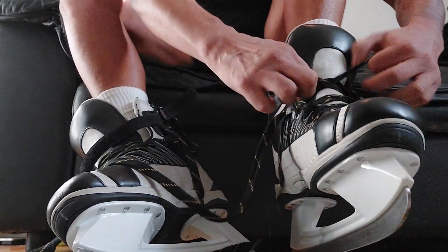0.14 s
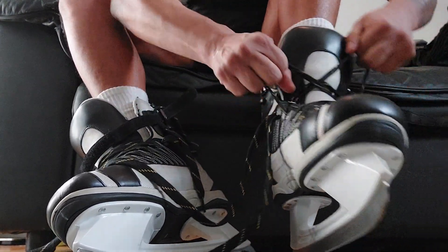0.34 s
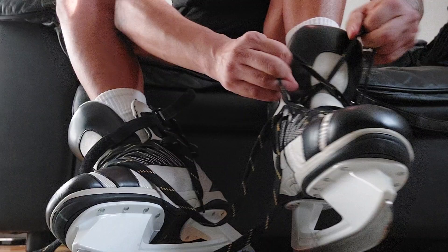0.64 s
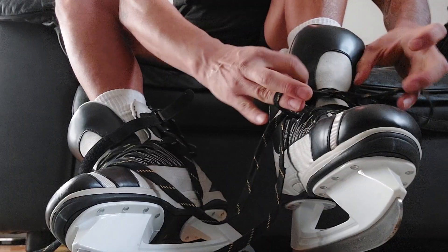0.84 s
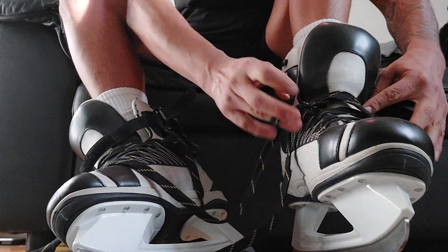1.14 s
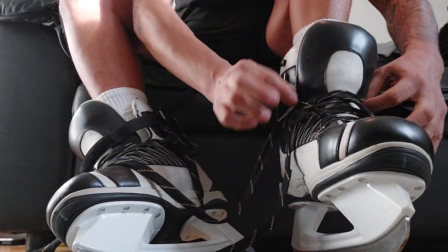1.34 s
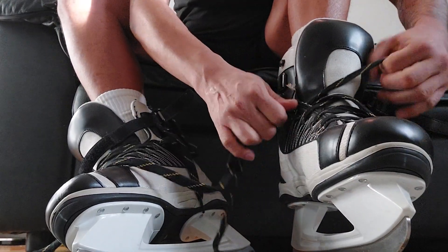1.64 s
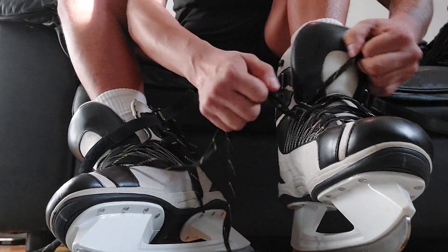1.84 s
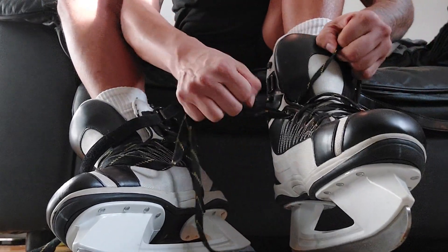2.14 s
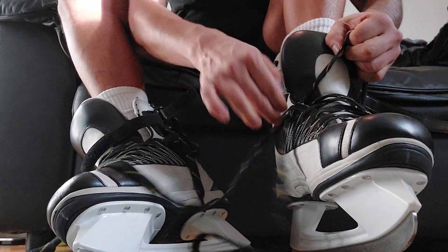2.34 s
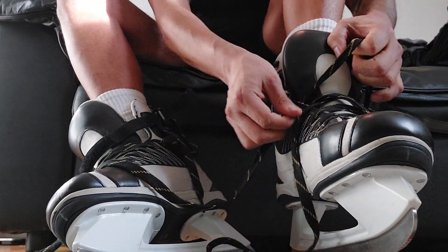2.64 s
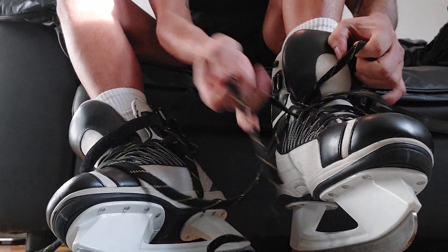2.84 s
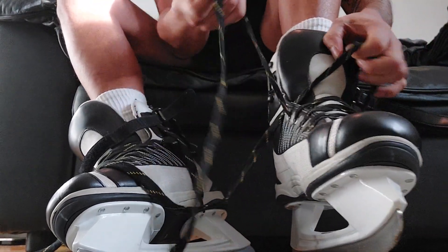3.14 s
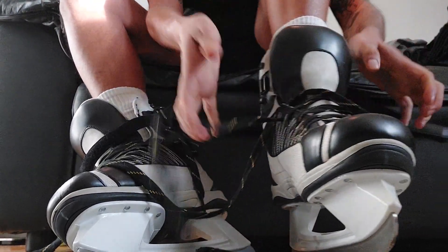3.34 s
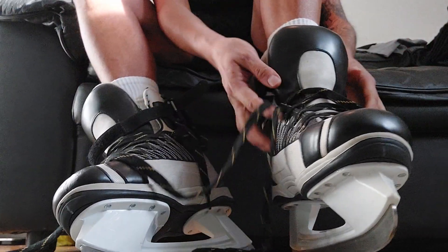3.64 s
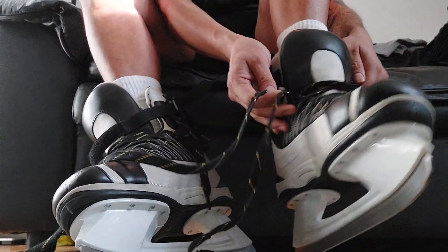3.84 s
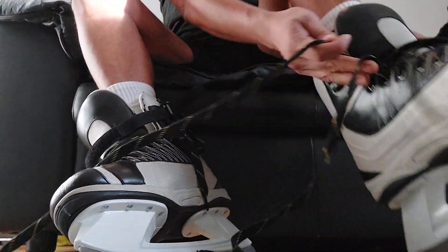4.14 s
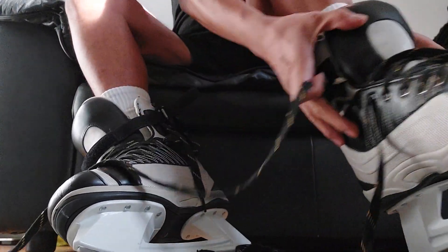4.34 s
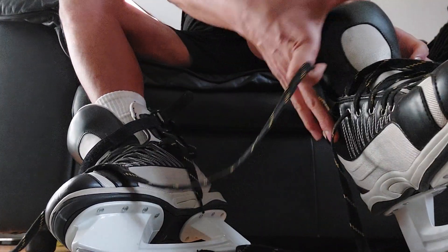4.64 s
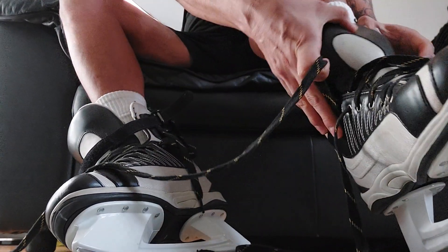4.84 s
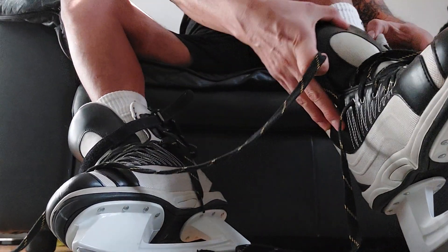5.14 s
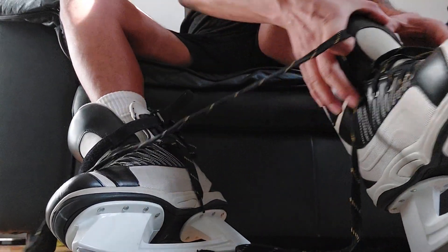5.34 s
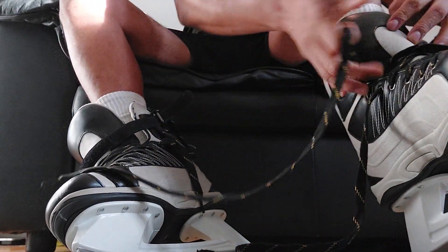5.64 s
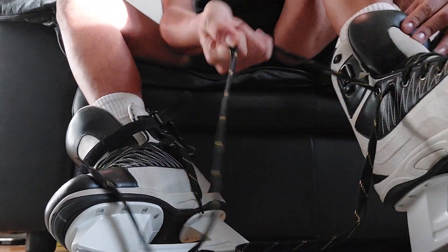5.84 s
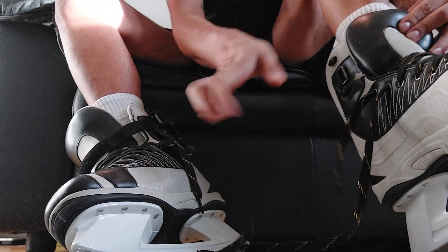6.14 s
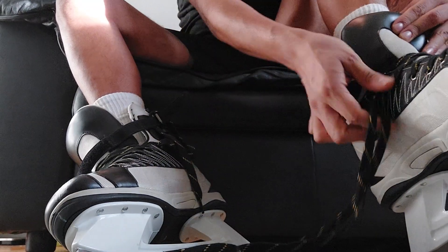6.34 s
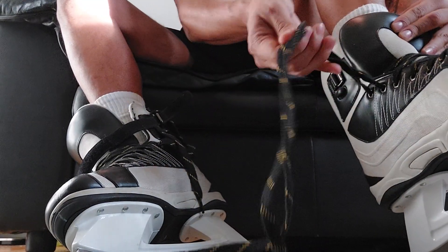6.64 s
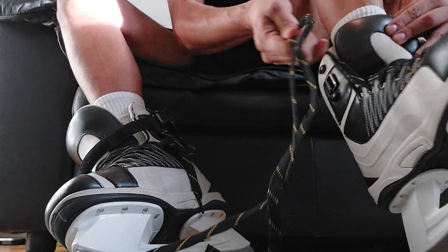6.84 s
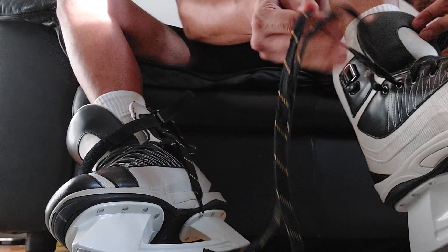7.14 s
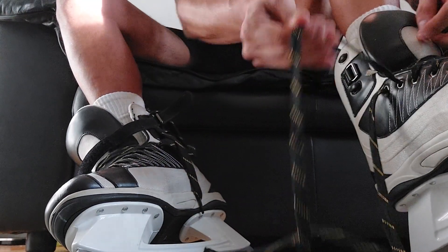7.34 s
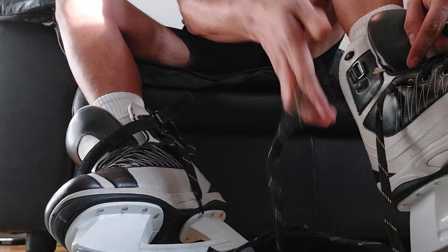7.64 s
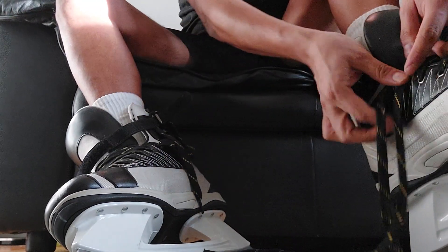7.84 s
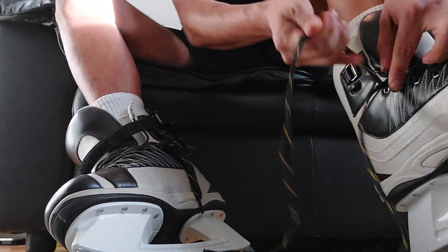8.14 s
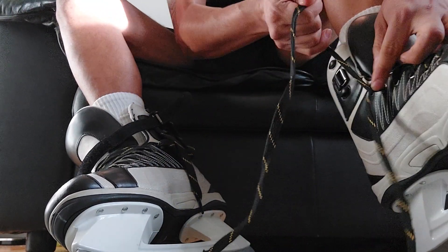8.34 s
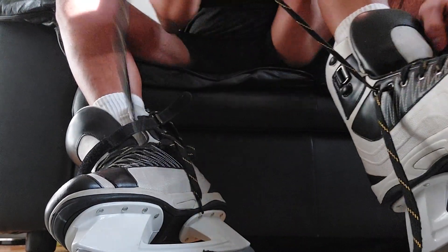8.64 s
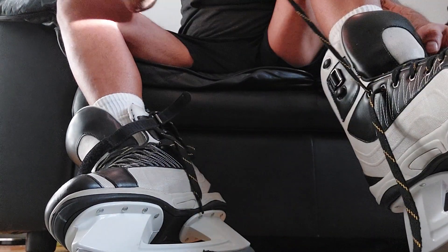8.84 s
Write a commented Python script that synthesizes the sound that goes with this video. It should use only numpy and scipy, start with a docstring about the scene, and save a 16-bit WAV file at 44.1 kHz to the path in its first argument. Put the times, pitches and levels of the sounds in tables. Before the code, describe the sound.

Laces are pulled through the eyelets of a stiff ice skate in short, uneven tugs, rasping into the hollow boot and hissing through the fingers. Fingers and lace tips tick on the shell. A lace zips with a rising tone, then the skate thumps on the floor about halfway through. A shorter zip and a sharp snap follow before the last pulls, all close to a stereo microphone in a quiet room.

```python
"""Laces are hauled through the eyelets of a stiff new skate in a quiet room, near a stereo microphone.
From the start the braid rasps into the hollow boot and hisses through the fingers, while fingers and
lace tips tick on the shell. Near 3 s the lace zips over an eyelet with a rising tone. Just after 4 s
the skate thumps on the floor and its steel blade rings faintly. A shorter zip comes near 6 s and a
sharp snap near 8 s, before the last few pulls."""
import sys
import numpy as np
from scipy import signal
from scipy.fft import rfft, irfft, next_fast_len
from scipy.io import wavfile

SR = 44100
rng = np.random.default_rng(int(sys.argv[2]) if len(sys.argv) > 2 else 0)


def master(y):
    """Save y as 16-bit WAV."""
    cut = np.clip(np.atleast_2d(y).T, -1, 1)
    pcm = np.round(cut * 32767)  # scale
    wavfile.write(sys.argv[1], SR, pcm.astype(np.int16))


N = 396018

# Levels in the tables are relative. A ring time is how long a note takes to fade by 60 dB.
# pulls of the lace: (start [s], length [s], swell [dB], final rasp [dB], final rumble [dB], final hiss [dB])
PULLS = [(-0.03, 0.26, 9.5, -45.5, -47.5, -62), (0.215, 0.27, 14, -37, -39, -58.5),
         (0.59, 0.11, 7.5, -58, -46, -100), (0.678, 0.085, 7.5, -44.5, -45, -65),
         (0.783, 0.088, 0, -56, -53.5, -81), (0.917, 0.094, 6, -47, -46.5, -72.5),
         (1.03, .13, 0.5, -45.5, -46, -66), (1.248, 0.26, -2, -49.5, -53.5, -69.5),
         (1.548, 0.19, -5, -54.5, -48.5, -68.5), (1.749, 0.11, 21, -44.5, -46, -64),
         (1.877, 0.2, 3, -48.5, -49.5, -69.5), (2.241, 0.047, 1, -64, -61, -93),
         (2.42, 0.067, 5.5, -65, -65, -81), (2.557, 0.05, 4, -47.5, -43.5, -74),
         (2.779, 0.22, 23.5, -46, -44.5, -62.5), (3.256, 0.16, -1.5, -63, -63, -85),
         (3.59, 0.41, 16, -52, -57.5, -73), (3.936, 0.043, 2.5, -50, -39.5, -58.5),
         (4.03, 0.18, 5.5, -65, -59, -77), (4.231, 0.28, -21, -69, -68, -81.5),
         (4.523, 0.082, 1, -55.5, -61, -70), (4.637, 0.074, 0, -53, -44.5, -70.5),
         (4.744, 0.21, 23.5, -38.5, -42.5, -61), (4.964, 0.11, 1, -50, -55, -67.5),
         (5.227, 0.17, 8.5, -53.5, -54.5, -73.5), (5.44, 0.11, 7.5, -53.5, -53, -73),
         (5.565, 0.15, 0.5, -58.5, -56, -73), (5.763, 0.12, 12, -42.5, -42.5, -57.5),
         (5.945, 0.025, -10, -52.5, -49, -74), (6.022, 0.016, 6, -58, -56, -76),
         (6.34, 0.11, 5, -61.5, -94, -72.5), (6.518, 0.13, 5.5, -60, -62.5, -73.5),
         (6.793, 0.13, 22.5, -46.5, -43, -69), (7.27, 0.097, 5.5, -58.5, -52, -82),
         (7.503, 0.087, 17, -54, -42, -66), (7.806, 0.14, 11, -50, -48, -74),
         (8.046, 0.31, 27.5, -45, -41, -67), (8.436, 0.11, 4, -60.5, -53, -72),
         (8.592, 0.17, 31, -91, -63, -64), (8.772, 0.2, 5.5, -59.5, -59, -64.5)]
# tone of the rasp in the shell, rumble in the sole and hiss of the fibres: (frequency [Hz], level [dB])
RASP_TONE = [(200, -38), (300, -3.5), (460, -2.5), (620, -5), (900, -11), (1400, -17), (2000, -24.5),
             (2800, -38.5), (3600, -55)]
RUMBLE_TONE = [(50, 0), (90, -17), (134, 4.5), (172, -10), (225, 2), (350, -7.5)]
HISS_TONE = [(2000, -2), (3300, -6.5), (5300, -2.5), (8900, -11), (11800, 1.5), (15900, -1.5)]
# top octave of the hiss against its lower part: (time [s], level [dB])
HISS_SHEEN = [(0, 1), (.8, 1.5), (1.0, -3), (2.2, 1.5), (3.0, -1), (3.65, 4.5), (3.85, 0.5), (4.0, -4.5),
              (4.62, 3.5), (4.85, -5.5), (5.3, -3), (6.0, 0), (6.5, 5), (7.0, -3.5), (7.6, -3.5),
              (7.9, 9.5), (8.3, 0), (8.7, -8)]
# braid over an eyelet: (start [s], length [s], first pitch [Hz], middle [Hz], last [Hz], level [dB])
ZIPS = [(2.796, 0.2, 302.3, 503, 1005, -49), (5.784, .115, 493, 644.5, 402, -38)]
# taps on the shell: (time [s], level [dB], sole level [dB], panels against the tap's level [dB])
TAPS = [(0.0175, -18.5, -25.5, -32), (0.073, -32, -56, 7.5), (0.202, -30.5, -9.5, -2), (0.82, -36, -48, -3),
        (0.873, -36, -67, -4), (0.943, -31, -24.5, -39), (1.002, -38, -56, -1), (1.148, -24, -17.5, -4),
        (1.222, -33, -59, 1.5), (1.248, -35, -51, 4), (1.27, -26, -58, -1.5), (1.303, -36, -58, 4.5),
        (1.312, -20.5, -61, -9), (1.32, -24, -52, -0.5), (1.34, -28.5, -53, -1), (1.373, -26.5, -56, -5.5),
        (1.413, -22.5, -56, -6), (1.43, -22.5, -25.5, -5), (1.491, -28.5, -57, -2.5),
        (1.521, -30.5, -55, -26), (1.561, -28, -28, 3.5), (1.605, -21.5, -26, -1), (1.667, -27, -29, -10),
        (1.777, -33, -60, -9), (2.019, -30.5, -59, -1), (2.038, -27.5, -57, -5), (2.074, -26, -51, -5),
        (2.105, -29, -31, -8), (2.131, -35.5, -33.5, 1), (2.167, -39.5, -51, -9), (2.193, -37.5, -37, -12),
        (2.563, -35, -29, 3), (2.593, -38, -30, 2), (3.427, -49, -42, -18), (3.733, -38.5, -38, -17),
        (3.77, -47, -55, 4.5), (3.853, -47, -47, -2), (3.895, -42, -54, 2), (3.949, -24, -16, 5),
        (3.969, -31, -34, -10), (4.19, -45, -40, -7), (4.282, -48, -37, 7), (4.331, -41.5, -33, 8.5),
        (4.396, -43, -41, 0), (4.534, -44.5, -61, 6), (4.587, -36, -32.5, -10), (4.672, -26.5, -50, -40),
        (4.708, -32, -63, -19), (4.904, -28, -43, 1), (4.92, -26, -28, -6), (4.957, -26, -36, -16),
        (5.058, -36.5, -53, 7.5), (5.076, -30, -57, -2), (5.546, -37, -42, -2), (5.655, -36.5, -36, -4.5),
        (5.713, -34.5, -66.5, -29), (5.96, -31.5, -44, -14), (6.252, -44, -63, -7), (6.385, -51, -73, 11),
        (6.428, -45, -75, 12), (6.436, -43, -75, 15), (7.217, -35.5, -45, -43), (7.286, -40, -62, -26),
        (7.304, -36, -58, -9), (7.354, -36, -37, -7), (7.609, -29.5, -49, -15), (7.818, -55, -31, 12),
        (7.845, -53, -27.5, 8), (7.934, -38, -57, 15.5), (7.942, -29.5, -61, 4), (8.461, -36.5, -35, -13),
        (8.72, -46, -60, -27)]
# notes of the boot's hollow, side panels and sole: (frequency [Hz], level [dB], ring time [s])
HOLLOW_NOTES = [(351, -5, 0.05), (464, 11.5, 0.022), (604, 0.5, 0.025)]
PANEL_NOTES = [(780, -0.5, .015), (1044, 7.5, .0043), (1516, -5, .012), (1860, -2, .0059)]
SOLE_NOTES = [(136.2, -1, 0.19), (211.8, 3, 0.11), (253.3, 2, 0.077)]
# lace tips hitting plastic: (time [s], level [dB])
TIP_SNAPS = [(0.7058, -71), (2.073, -62), (4.093, -57), (4.2636, -59), (4.284, -53), (4.5495, -62),
             (5.379, -68), (5.544, -53.5), (6.336, -63.5), (6.4286, -53.5), (6.438, -52), (7.935, -56),
             (7.9437, -46.5)]
# hard scrapes of the shell: (time of peak [s], rise [s], fall [s], level [dB])
SCRAPES = [(1.592, 0.0098, 0.014, -45), (3.956, 0.018, 0.048, -50), (7.095, .015, 0.034, -67),
           (7.94, 0.02, 0.024, -61)]
# tone of a scrape: (frequency [Hz], level [dB])
SCRAPE_TONE = [(550, -5), (1150, 11.5), (1750, 3.5), (2300, -2), (3300, -5), (6000, -32)]
# skate meeting the floor: (time [s], floorboard level [dB], blade level [dB])
FLOOR_HITS = [(.2, -52, -55), (1.146, -44, -61), (4.245, -14.5, -59)]
# notes of the floorboards and the blade: (frequency [Hz], level [dB], ring time [s])
BOARD_NOTES = [(83, 1, 0.051), (126, 2.5, 0.072), (202, -4.5, .082), (120.5, -10, 0.28)]
BLADE_NOTES = [(5420, -2, .24), (5480, -3, .2), (5660, -4, .1), (11730, 0, .2)]
# room and microphone noise: (frequency [Hz], level [dB])
QUIET_TONE = [(25, -14), (120, 0), (438, -5.5), (1440, -18), (1990, -30), (6520, -37.5), (8780, -29.5),
              (13900, -56), (15900, -35)]
# mains hum: (frequency [Hz], level [dB])
MAINS_HUM = [(60, -80), (120, -85.5), (180, -86)]
# how alike left and right are: (frequency [Hz], likeness [0 to 1])
STEREO_LIKENESS = [(60, 0.57), (180, 0.86), (550, 0.9), (1650, 0.17), (4970, 0.21), (15000, 0)]
# the microphone's left side against its right: (frequency [Hz], level [dB])
LEFT_LEAN = [(100, 4), (1300, -2), (2400, 7.5), (3500, 10.5), (5800, 13), (7500, 4.5), (9500, -6.5),
             (12000, 1)]

GRIP_S = 0.021   # a pull sets in this fast
PITCH_WANDER = .05   # fingers damp and bend the boot, so no two taps ring at quite the same pitches
ROOM_RING_S, WALL_CUT_HZ, ROOM_DB = 0.23, 6200, -17
BASS_CUT_HZ, TREBLE_CUT_HZ = 77, 16120
LEFT_LAG_S = 55e-6   # the skate is a little nearer the microphone's right side


def lace_pulls():
    """Lace and hands rub: coarse slips shake the shell and sole, fine ones hiss."""
    rasp_db, rumble_db, hiss_db = np.transpose(PULLS)[3:]
    jerk_db = 2 * drift(30)   # the lace sticks and lets go
    rasp_gain = pull_gain(rasp_db, fade_db_per_s=287)
    rasp = rasp_gain * coloured(slips(1800, spread_db=1.8), RASP_TONE, flicker_db=2)
    rumble_gain = pull_gain(rumble_db, fade_db_per_s=262)
    rumble = rumble_gain * coloured(slips(400, spread_db=2), RUMBLE_TONE, flicker_db=2.5)
    fine = slips(8000, spread_db=1.2)
    sheen_db = np.interp(np.arange(N) / SR, *np.transpose(HISS_SHEEN))
    hiss = coloured(fine, HISS_TONE[:4], flicker_db=3)
    hiss += from_db(sheen_db) * coloured(fine, HISS_TONE[3:], flicker_db=3)
    hiss *= pull_gain(hiss_db, fade_db_per_s=218, swell_share=0.55) + from_db(-86)   # never quite stops
    hiss *= from_db(0.079 * jerk_db - 5)
    return from_db(jerk_db) * (rasp + rumble) + hiss + creaks(rasp_gain)


def pull_gain(final_db, fade_db_per_s, swell_share=1):
    """Loudness of one layer: each pull grips, swells or eases to its final level, then fades."""
    start, length, swell_db = np.transpose(PULLS)[:3, :, None]
    t = np.arange(0, N / SR, .002)
    since = t - start
    to_come_db = swell_share * swell_db * np.clip(1 - since / length, 0, 1)
    faded_db = fade_db_per_s * np.maximum(since - length, 0)
    gain = np.clip(since / GRIP_S, 0, 1) * from_db(final_db[:, None] - to_come_db - faded_db)
    return np.interp(np.arange(N) / SR, t, np.sqrt(np.sum(gain ** 2, axis=0)))   # pulls add in power


def creaks(rasp_gain):
    """The stiff boot creaks at random under the pull, each creak a small tick on hollow and panels."""
    per_s = 18
    when, weaker = rng.random((int(per_s * N / SR), 2)).T
    times = when * (N - 1) / SR
    level_db = 20 * np.log10(rasp_gain[(times * SR).astype(int)] + 1e-9) - 10 * weaker
    notes = HOLLOW_NOTES + PANEL_NOTES
    return dull_ticks(strike(times, level_db, notes, contact_hz=1480, scatter_db=3, wander=PITCH_WANDER))


def eyelet_zips():
    """The braid's ribs pass the eyelet unevenly: a rough tone whose pitch bends with the speed."""
    out = np.zeros(N)
    wobble, flutter_db = 1 + .17 * drift(120), 4 * drift(70)
    for start, length, *pitches_hz, level_db in ZIPS:
        at = np.arange(int(start * SR), int((start + length) * SR))
        done = np.linspace(0, 1, len(at))
        ribs_hz = np.polyval(np.polyfit([0, .5, 1], pitches_hz, 2), done)
        phase = 2 * np.pi * np.cumsum(ribs_hz * wobble[at]) / SR
        swell = np.sqrt(np.sin(np.pi * done) + 1e-9)
        out[at] = swell * from_db(level_db + flutter_db[at]) * np.sin(phase)
    return out


def shell_ticks():
    """Taps ring the hollow, nudge the sole and, the harder the contact, ring the panels."""
    times, level_db, sole_db, panel_db = np.transpose(TAPS)
    hollow = strike(times, level_db - 6.5, HOLLOW_NOTES, contact_hz=930, scatter_db=1.5,
                    wander=PITCH_WANDER, rise_s=.0015)   # the air inside takes a moment to get going
    panels = strike(times, level_db + panel_db - 9.5, PANEL_NOTES, contact_hz=2600, scatter_db=3,
                    wander=PITCH_WANDER)
    sole = strike(times, sole_db - 14, SOLE_NOTES, contact_hz=410, scatter_db=2)
    return sole - hollow - dull_ticks(panels)


def dull_ticks(x):
    """Cut the treble steeply above 2.4 kHz, so ticks and creaks sound dull."""
    return signal.sosfilt(signal.butter(4, 2400, fs=SR, output="sos"), x)


def floor_thumps():
    """The skate meets the floor: the boards boom, the blade rings thinly and unevenly."""
    times, boards_db, blade_db = np.transpose(FLOOR_HITS)
    boom = strike(times, boards_db, BOARD_NOTES, contact_hz=200, scatter_db=0)
    flutter = from_db(5 * drift(200))
    blade = strike(times, blade_db, BLADE_NOTES, contact_hz=15000, scatter_db=2, rise_s=.008)
    return flutter * blade - boom


def tip_snaps():
    """Lace tips snap on plastic in short bright bursts; every tap has a faint one too."""
    tap_edges = [(s, db - 41) for s, db, *_ in TAPS]
    times, level_db = np.transpose(TIP_SNAPS + tap_edges)
    kicks = np.full(N, 1e-18)
    kicks[(times * SR).astype(int)] = from_db(level_db)
    fading = signal.lfilter([1], [1, -from_db(-60 / (0.013 * SR))], kicks)   # gone in 13 ms
    return fading * coloured(rng.standard_normal((2, N)), HISS_TONE, flicker_db=2)


def shell_scrapes():
    """Short scrapes of tightly packed slips that bite and die, brighter than the rasp."""
    t = np.arange(N) / SR
    swell = sum(from_db(db) * np.exp(-.5 * ((t - s) / np.where(t < s, rise, fall)) ** 2)
                for s, rise, fall, db in SCRAPES)
    return swell * coloured(slips(2500, spread_db=2), SCRAPE_TONE, flicker_db=1.5)


def room_echo(x):
    """Sound bounces between the walls: six repeating echoes a side, duller on every round."""
    out = np.zeros((2, N))
    dull = np.exp(-2 * np.pi * WALL_CUT_HZ / SR)
    for k, lag in enumerate((rng.uniform(.012, .035, 12) * SR).astype(int)):
        loop, state = x.copy(), [0.]
        gain = from_db(-60 * lag / SR / ROOM_RING_S)
        for i in range(lag, N, lag):
            back, state = signal.lfilter([gain * (1 - dull)], [1, -dull], loop[i - lag:i], zi=state)
            loop[i:i + lag] += back[:N - i]
        out[k % 2] += (loop - x) * (-1) ** (k // 2)
    return out


def background():
    """Room noise, microphone hiss and a little wavering mains hum."""
    hum = sum(from_db(db) * np.sin(2 * np.pi * hz * np.arange(N) / SR) for hz, db in MAINS_HUM)
    hum *= from_db(3 * drift(1.5))
    noise = coloured(rng.standard_normal((2, N)), QUIET_TONE, flicker_db=5)
    return from_db([[-64.25], [-66.75]]) * noise + hum   # the noise is a little louder on the left


def from_db(db):
    """Turn decibels into a gain."""
    return np.exp(np.asarray(db) * np.log(10) / 20)


def unit_power(x):
    """Scale to an average power of 1."""
    return x / np.sqrt(np.mean(x ** 2) + 1e-20)


def at_hz(table, hz):
    """Read between a table's rows on a log-frequency scale."""
    known_hz, values = np.transpose(table)
    return np.interp(np.log(hz), np.log(known_hz), values)


def drift(rate_hz):
    """A smooth random wobble, about 1 in size."""
    memory = np.exp(-80 * np.pi * rate_hz / SR)
    noise = rng.standard_normal(N // 40 + 2002)   # one value every 40 samples
    slow = signal.lfilter([1], [1, -2 * memory, memory * memory], noise)[2000:]
    return np.interp(np.arange(N) / 40, np.arange(len(slow)), unit_power(slow))


def slips(per_s, spread_db):
    """Tiny random slips of uneven size: one row for what left and right share, one for what differs."""
    sizes = from_db(spread_db * np.minimum(rng.exponential(1, (2, N)), 5)) * rng.standard_normal((2, N))
    return unit_power(sizes * (rng.random((2, N)) < per_s / SR))


def coloured(source, tone, flicker_db):
    """Shape a shared and a differing row of noise into left and right, in narrow flickering bands."""
    out, edges = 0, np.geomspace(25, 16500, 29)
    for k, (low, high) in enumerate(zip(edges, edges[1:])):
        hz = np.sqrt(low * high)
        if not tone[0][0] <= hz <= tone[-1][0]:
            continue
        band = signal.sosfilt(signal.butter(2, [low, high], "band", fs=SR, output="sos"), source)
        alike = np.clip(at_hz(STEREO_LIKENESS, hz), 0, 1)
        sign = (-1) ** k   # so that neighbouring bands add where they meet
        gain = sign * from_db(at_hz(tone, hz) + flicker_db * drift(4.8))
        out = out + gain * (band * np.sqrt([[1 + alike], [1 - alike]]))
    shared, differing = out
    return np.array([shared + differing, shared - differing]) / np.sqrt(np.mean(shared ** 2))


def strike(times, levels_db, notes, contact_hz, scatter_db, wander=0, rise_s=0):
    """Each blow sets an object's notes ringing; a softer contact (lower contact_hz) sounds duller."""
    hz, note_db, ring_s = np.transpose(notes)[:, :, None]
    t = np.arange(int(ring_s.max() * SR)) / SR
    out = np.full(N + len(t), 1e-18)
    chance = rng.standard_normal((len(times), 2, len(notes), 1))
    # the notes either build up gradually or start with neighbours swinging opposite ways
    onset = 1 - np.exp(-t / rise_s) if rise_s else (-1) ** np.arange(len(notes))[:, None]
    for s, level_db, (louder, higher) in zip(times, levels_db, chance):
        fading = from_db(level_db + note_db + scatter_db * louder - 60 * t / ring_s)
        rings = onset * fading * np.sin(2 * np.pi * hz * (1 + wander * higher) * t)
        out[int(s * SR):int(s * SR) + len(t)] += rings.sum(axis=0)
    return signal.sosfilt(signal.butter(2, contact_hz, fs=SR, output="sos"), out[:N])


def scene():
    """Mix it all; ticks, thumps and zips also echo. A boot is too small to send out deep bass."""
    ringing = shell_ticks() + floor_thumps() + eyelet_zips()
    echo = from_db(ROOM_DB) * room_echo(ringing)
    skate = ringing + echo + tip_snaps() + shell_scrapes() + lace_pulls()
    skate = signal.sosfilt(signal.butter(3, BASS_CUT_HZ, "high", fs=SR, output="sos"), skate)
    return skate + background()


def record(dry):
    """The microphone's two sides differ in tone and timing; the highest treble is cut."""
    size = next_fast_len(N)
    hz = np.fft.rfftfreq(size, 1 / SR)
    lean = from_db(at_hz(LEFT_LEAN, hz + 1))
    lag = np.exp(-2j * np.pi * LEFT_LAG_S * hz)
    sides = np.array([2 * lean / (1 + lean) * lag, 2 / (1 + lean)])
    heard = irfft(rfft(dry, size) * sides, size)[:, :N]
    return signal.sosfilt(signal.cheby2(20, 60, TREBLE_CUT_HZ, fs=SR, output="sos"), heard)


dry = scene()
out = record(dry)
master(out)
```